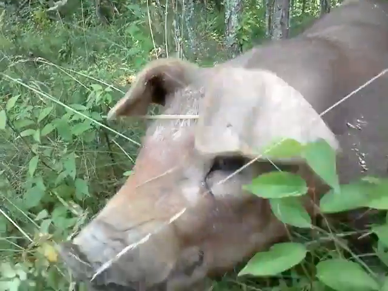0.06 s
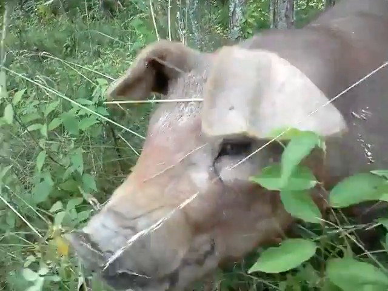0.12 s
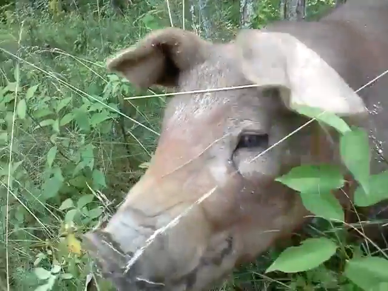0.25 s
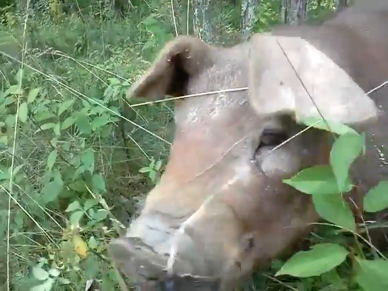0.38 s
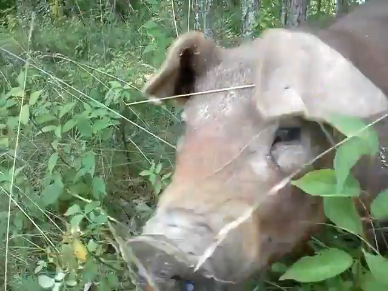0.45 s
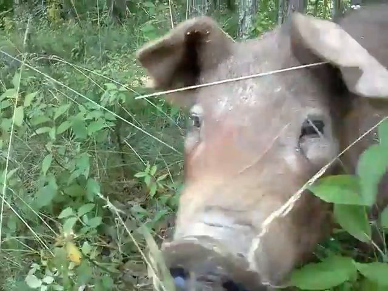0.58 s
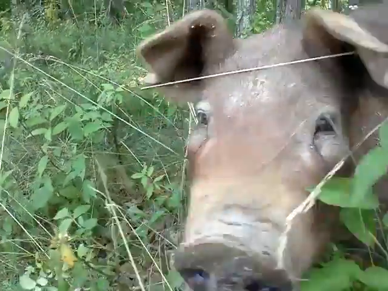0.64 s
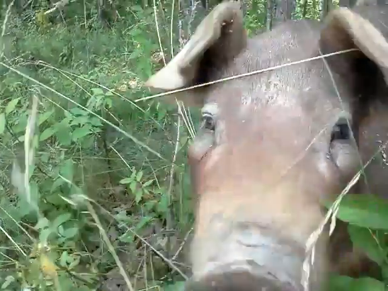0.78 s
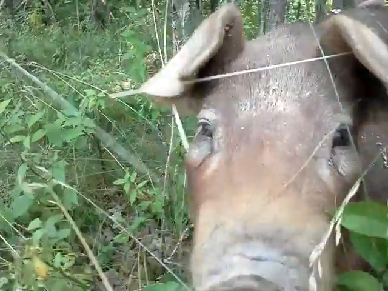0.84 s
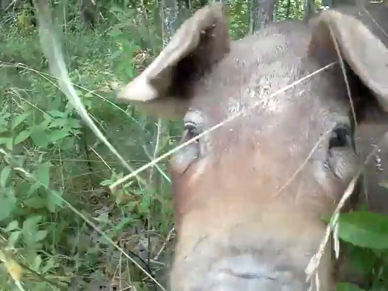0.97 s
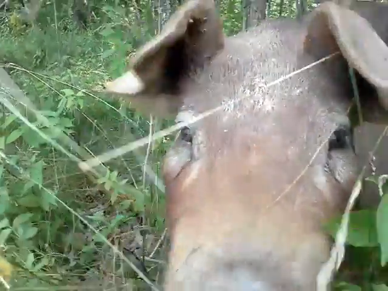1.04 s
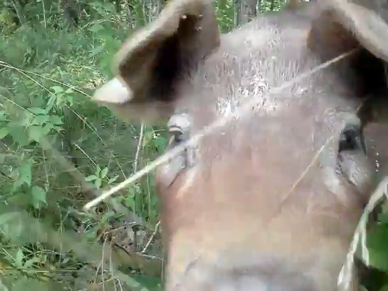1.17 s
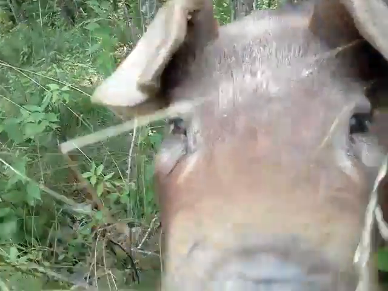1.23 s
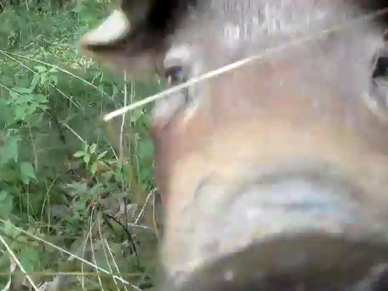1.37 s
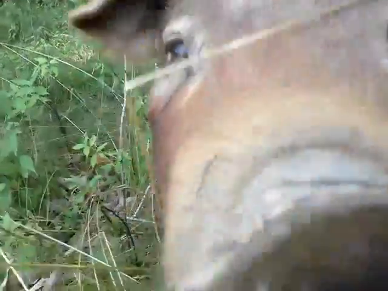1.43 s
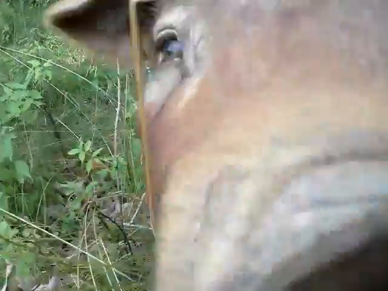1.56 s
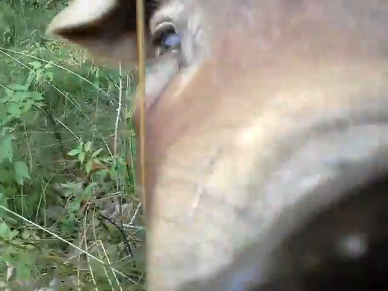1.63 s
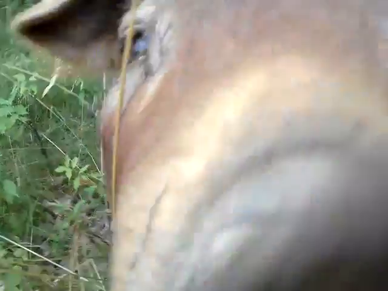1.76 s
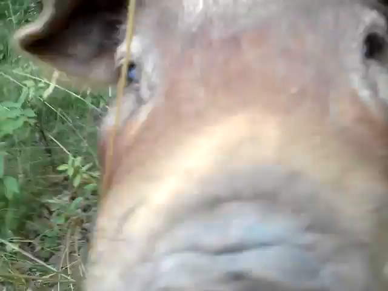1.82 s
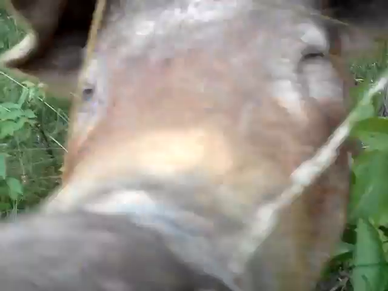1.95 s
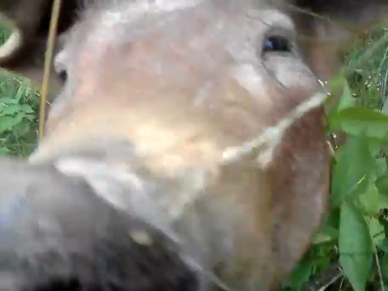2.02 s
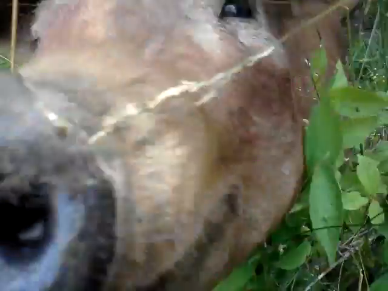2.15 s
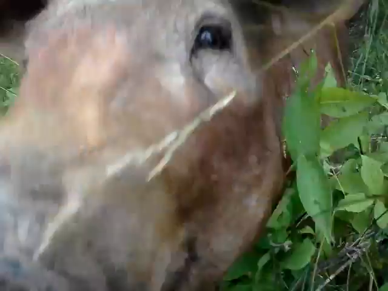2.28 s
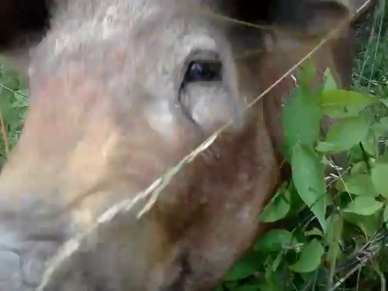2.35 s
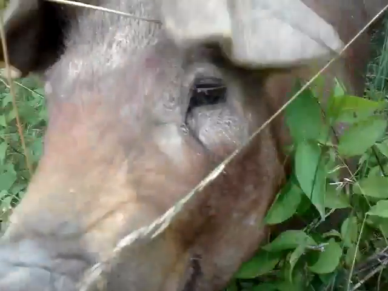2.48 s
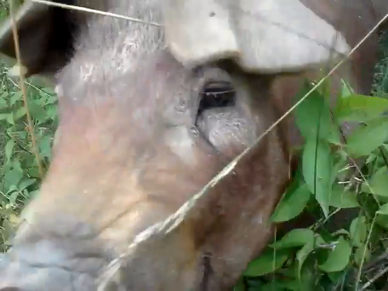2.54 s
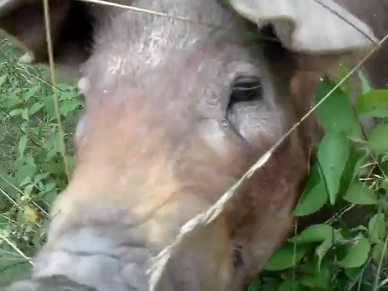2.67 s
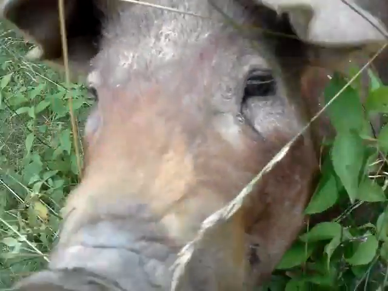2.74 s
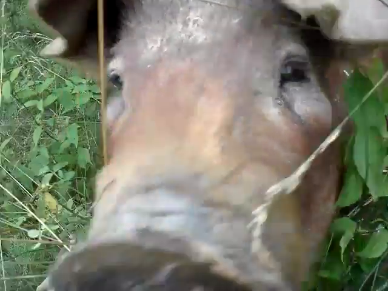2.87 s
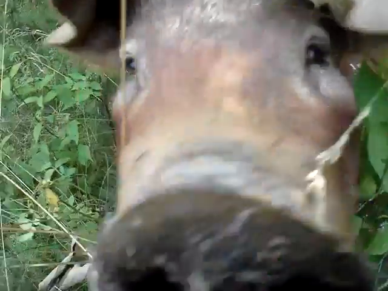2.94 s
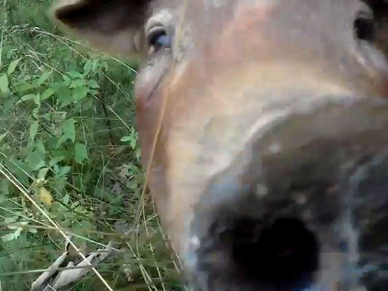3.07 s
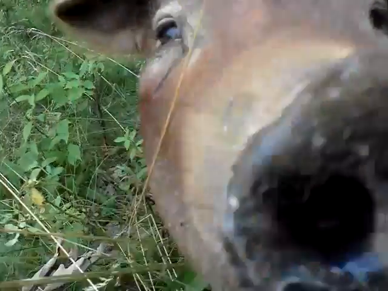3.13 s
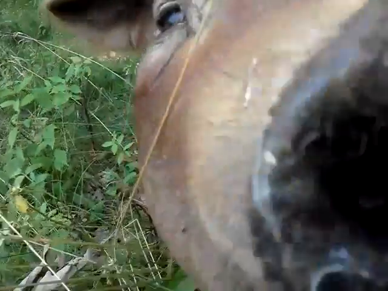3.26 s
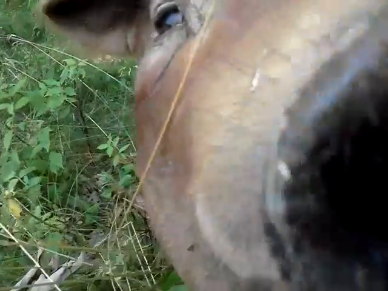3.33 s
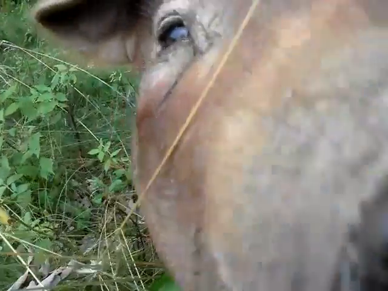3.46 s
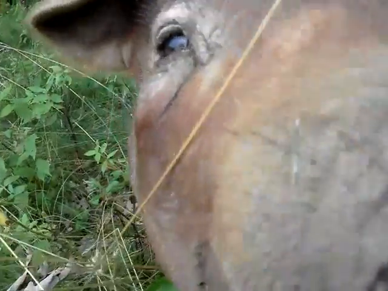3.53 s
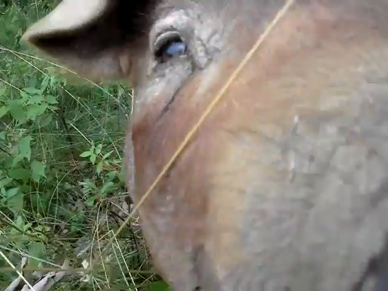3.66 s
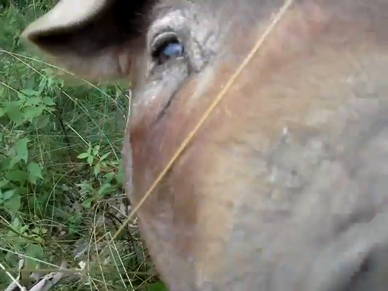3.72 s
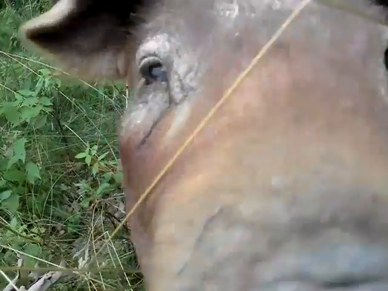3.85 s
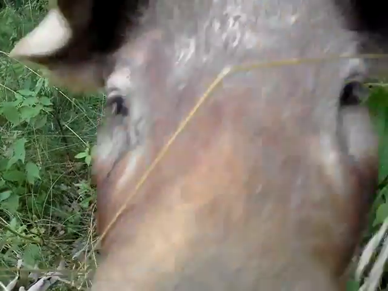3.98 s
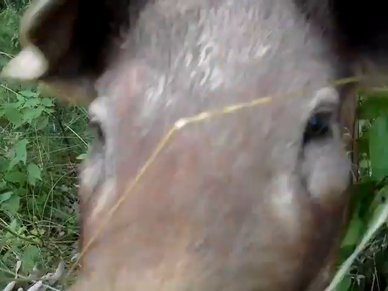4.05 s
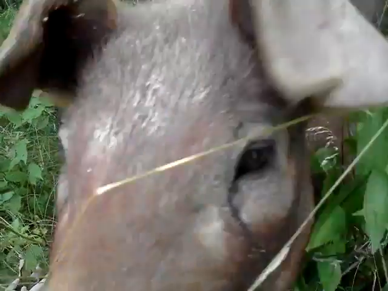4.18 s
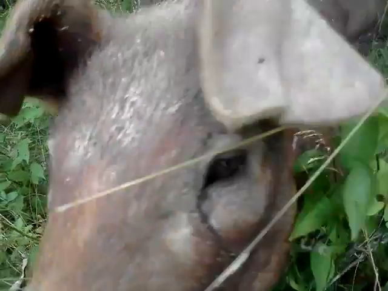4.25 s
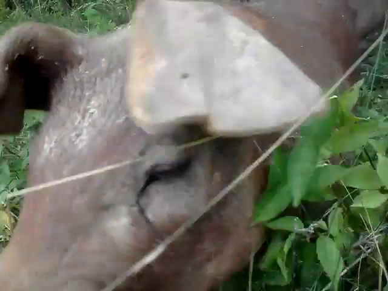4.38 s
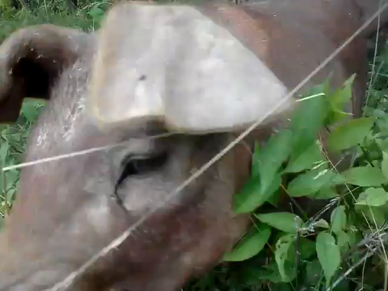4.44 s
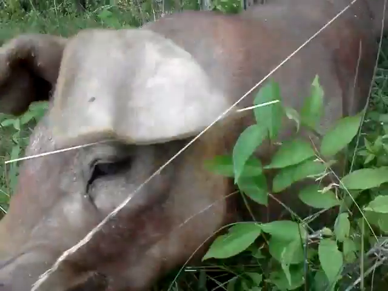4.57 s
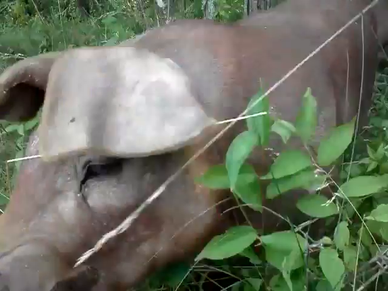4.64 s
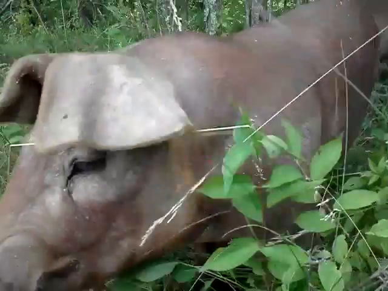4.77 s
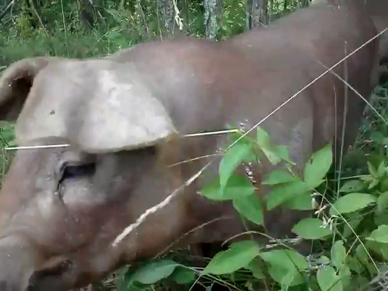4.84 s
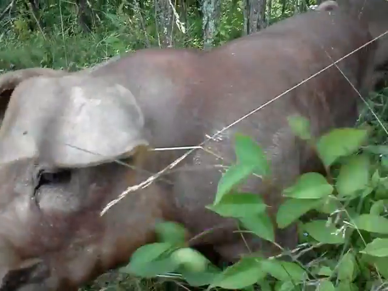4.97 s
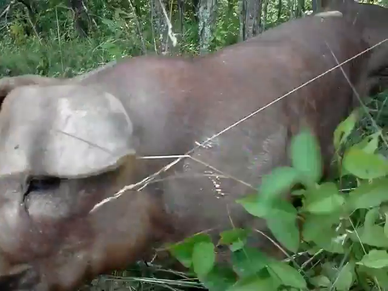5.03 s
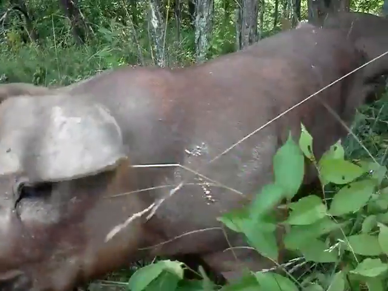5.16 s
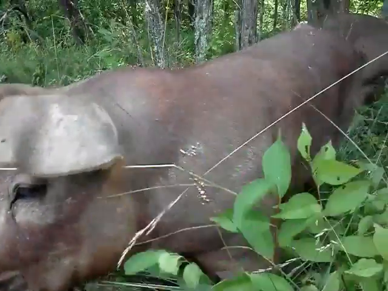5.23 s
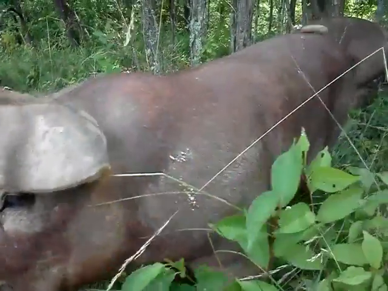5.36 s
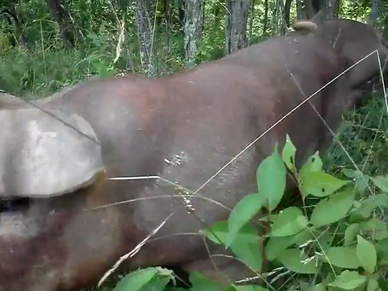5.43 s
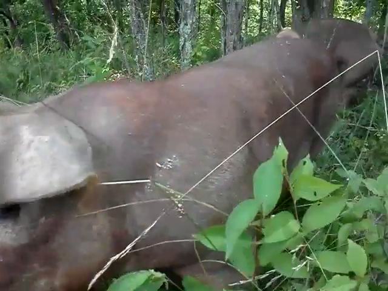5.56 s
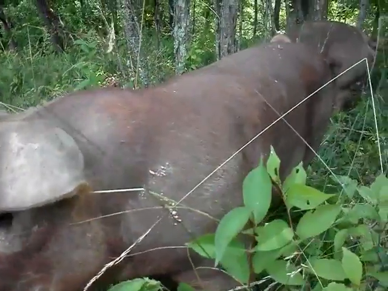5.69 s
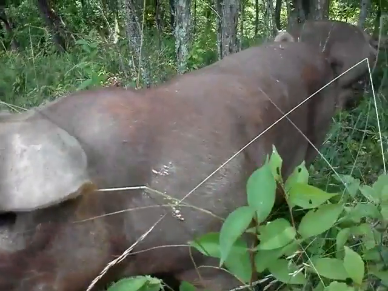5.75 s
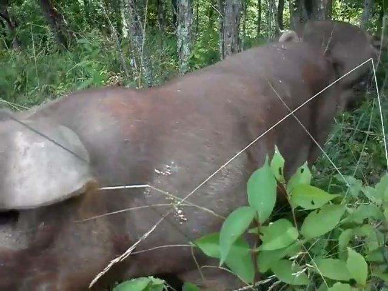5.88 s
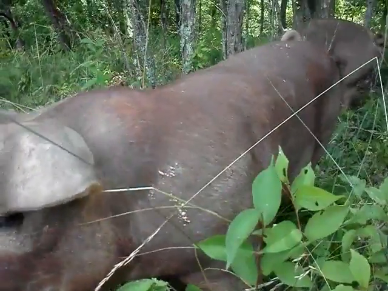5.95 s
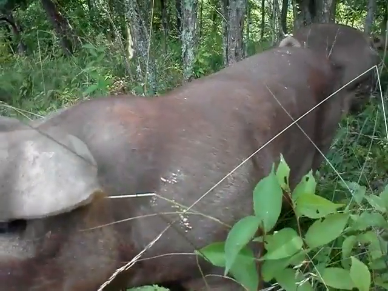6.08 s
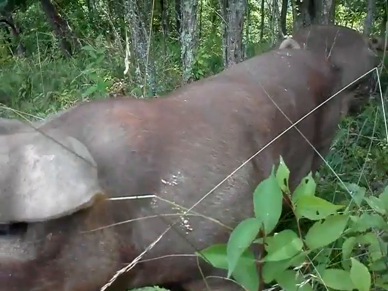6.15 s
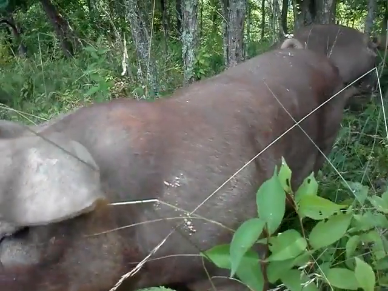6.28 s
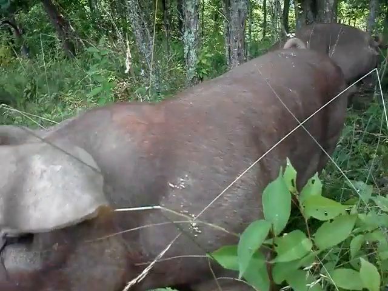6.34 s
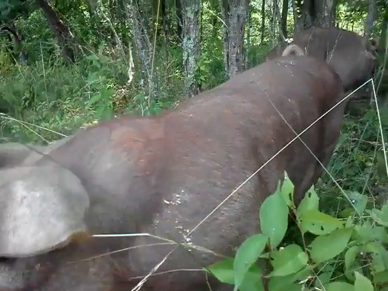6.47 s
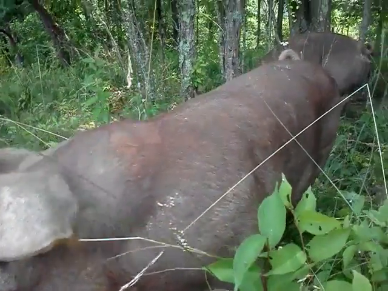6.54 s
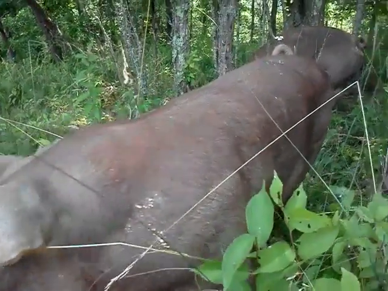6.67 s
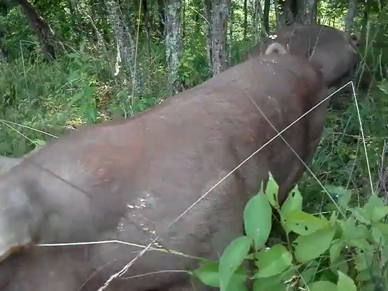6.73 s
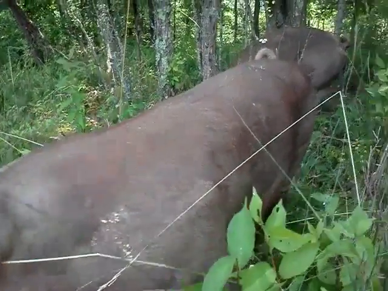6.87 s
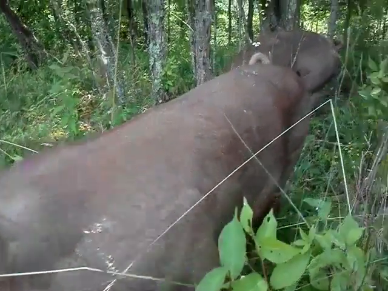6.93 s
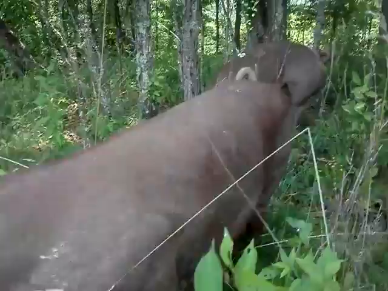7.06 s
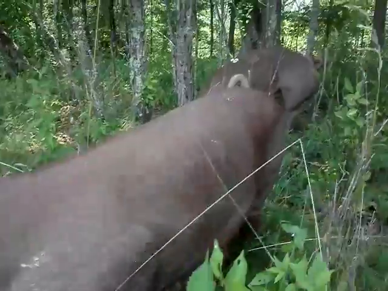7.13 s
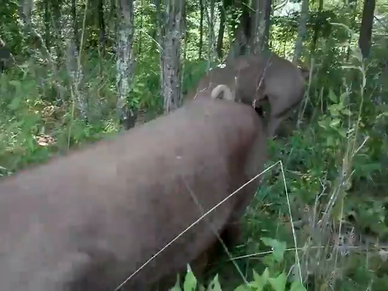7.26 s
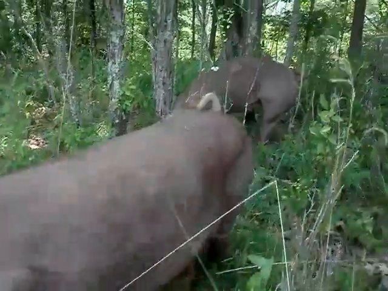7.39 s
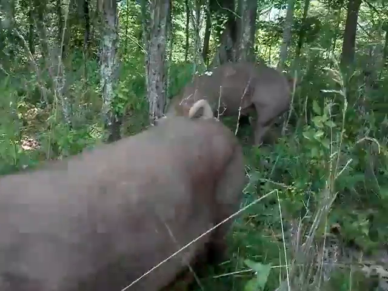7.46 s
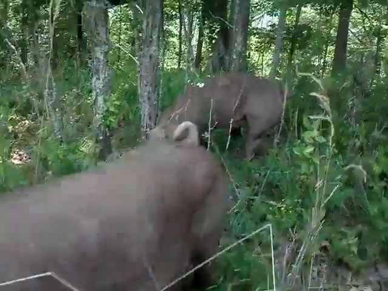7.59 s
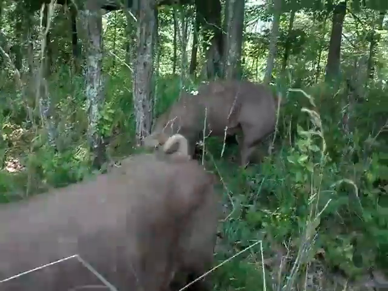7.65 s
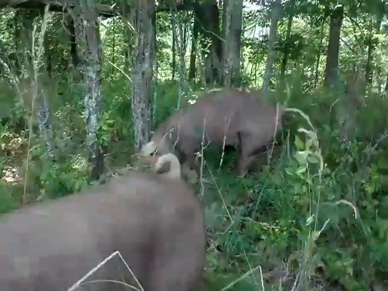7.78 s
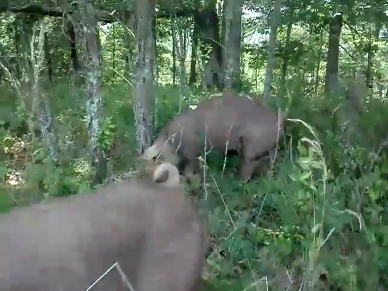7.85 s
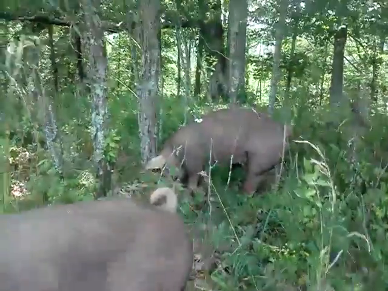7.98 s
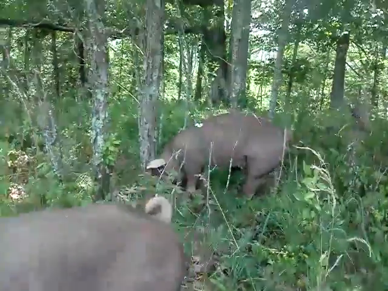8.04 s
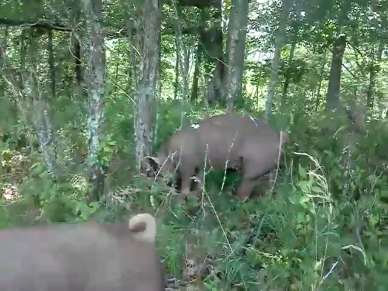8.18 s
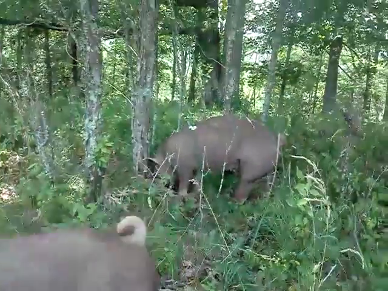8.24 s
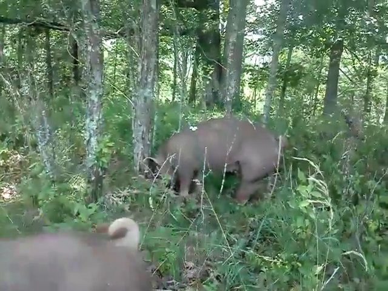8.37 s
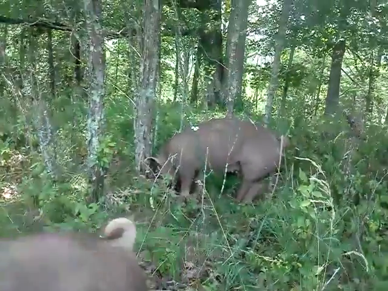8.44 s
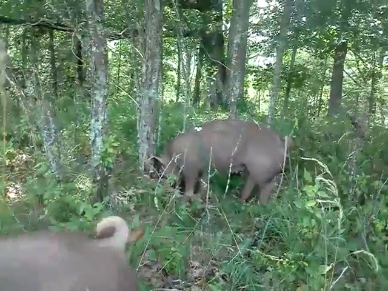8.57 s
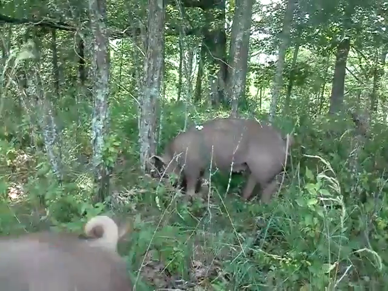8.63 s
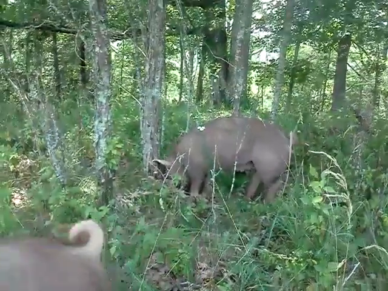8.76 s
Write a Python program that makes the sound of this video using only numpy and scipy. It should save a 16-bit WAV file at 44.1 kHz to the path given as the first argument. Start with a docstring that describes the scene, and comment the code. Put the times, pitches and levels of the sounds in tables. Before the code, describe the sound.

Quiet woodland air, with thin rustle and faint sniffs from 0.1 to 0.9 s; barely audible low hoots from a far bird come at 0.4 and 0.9. At 1.1 a loud swish of leaves arrives with a short, low double-pulsed grunt and snapping stems. Snorts grow closer: 1.4, a strong nasal blast at 1.9, softer ones at 2.1 and 2.4, with dense dry crackling and sharp snaps from 2.2 to 2.7. Light sniffs follow, then the loudest snort at 3.5 and a softer one at 3.9. Leaves brush again at 4.3-4.7 with weak sniffs. From 5 to 6.3 it is calm: slight rustle, faint high bird whistles near 5.4-5.7, a last tiny sniff at 5.7. A low grunt at 6.85 precedes a crackling sweep through plants, 7.0-7.6. Lighter brushing and ticks continue, with a final grunt at 8.2, ending at 8.8.

```python
"""Leaves brush and a pig sniffs, then snorts harder, close by in a wood; no snorts after 5.8 s.
Snorts: noise through nose resonances plus nostril hiss. Three low grunts: vocal-fold flaps ringing the throat.
Plants: friction noise and clumped clicks, coloured as leaf, grass and stem; dry stems snap, twigs tick.
Behind: soft air noise and faint wavering sine notes of far birds, low hoots and higher whistles.
"""
import sys
import numpy as np
from scipy import signal
from scipy.fft import rfft, irfft
from scipy.io import wavfile
from scipy.ndimage import uniform_filter1d

SR = 44100
rng = np.random.default_rng(int(sys.argv[2]) if len(sys.argv) > 2 else 0)


def unload_audio(sound):
    """Save the sound as a 16-bit wav file, at the path given as the first command line argument."""
    columns = np.transpose(np.atleast_2d(sound))
    # keep every value between -1 and 1, then stretch to whole-number steps
    steps = np.round(np.clip(columns, -1, 1) * 32767)
    wavfile.write(sys.argv[1], SR, steps.astype(np.int16))


N = 388521
TIME_S = np.arange(N) / SR

# Air blasts through the snout: start_s, end_s, level_db, hiss_above_level_db, nose_pitch_factor
SNORT_BLASTS = [(0.143, 0.334, -37, 1, 1.12), (0.503, 0.627, -42.5, 3, 1.02),
                (0.781, 0.908, -37.5, 8.5, 1.04), (1.119, 1.217, -31.5, 2, 1.13),
                (1.415, 1.508, -25.5, 4, 1.06), (1.921, 2.038, -17.5, 0, 1.074),
                (2.133, 2.232, -26.5, -2, 1), (2.395, 2.546, -31, 3.5, 0.96), (2.71, 2.833, -42.5, 3, 0.99),
                (3.034, 3.11, -36.5, 4.5, 0.98), (3.47, 3.635, -17, 4, 1.065),
                (3.881, 4.052, -28, 2, 1.016), (4.192, 4.325, -42, 0.5, 0.93), (4.464, 4.606, -43, 1, 0.98),
                (4.6, 4.68, -49, 1, 0.92), (5.687, 5.78, -49, 2, 0.96)]
# Nose resonances before the pitch factor: centre_hz, width_hz, relative_db
NOSE_MODES = [(102, 132, -8.5), (276, 60.5, 2), (361, 132, -3.5), (530, 166, -6.5), (770, 380, -12.5),
              (1056, 175, -9.5), (1890, 340, -17)]
# Jet spectrum at the nostril rims: frequency_hz, relative_db_per_hz
JET_SPECTRUM = [(40, -3), (150, -14.5), (400, -12), (1400, -10), (2400, -4), (2900, -4), (3500, 1),
                (4800, 1.5), (7000, -4.5), (8500, -12)]

# Grunts: start_s, flaps_count, first_gap_s, last_flap_relative_db, brightness_hz, mouth_opening_pitch_factor
GRUNT_EVENTS = [(1.0566, 2, .0275, -2, 2200, 0.98), (6.845, 3, 0.023, -12, 3400, 1.0),
                (8.1757, 3, 0.022, -13.5, 2090, 1.067)]
# Throat resonances, nominal pitch: centre_hz, relative_db, t60_s
THROAT_MODES = [(96, -16.5, 0.11), (231.5, 0.5, 0.052), (427, -7.5, 0.028), (701, -4, 0.061),
                (1060, -3.5, 0.011), (1595, -8.5, 0.032), (1945, -2.5, 0.013), (2300, -5, 0.016)]
# First flap is dull; later ones are louder, each after a longer gap than the last
FIRST_FLAP_BRIGHTNESS_HZ, GAP_GROWTH_RATIO, FLAP_RISE_DB = 360, 1.33, 5
# Low resonances stir as the folds open, just ahead of the closing slap
OPENING_LEAD_S, OPENING_HZ = 0.0025, 402

# Shoves of snout, flank or leg through plants:
# start_s, end_s, leaf_db, stem_relative_to_leaf_db, dryness_0_to_1, taper_exponent (low abrupt, high gradual)
PLANT_SHOVES = [(0.053, 0.129, -40.5, -13, 0.67, 0.72), (0.644, 0.797, -38, -20, .4, 0.54),
                (1.071, 1.212, -14, -10.5, 0.36, 0.54), (1.277, 1.303, -33, 0, 0.5, 0.45),
                (1.314, 1.362, -28.5, -4.5, 1, 0.42), (1.509, 1.6, -25, -8, 0.94, 0.51),
                (1.605, 1.786, -32, -11, .9, .4), (1.901, 2.207, -25, -5.5, 0.32, 0.28),
                (2.233, 2.467, -20.5, -9, .9, .5), (2.375, 2.416, -17, -3.5, 0.79, .6),
                (2.455, 2.675, -35, -10, .9, 0.39), (3.119, 3.473, -34.5, -13.5, 0.57, 0.1),
                (3.643, 3.699, -30, -19, 0.48, 0.55), (3.803, 3.88, -32.5, -15, 0.76, .7),
                (4.042, 4.14, -42, -7, 0.58, 0.8), (4.304, 4.421, -28, -9, 0.45, 0.59),
                (4.396, 4.639, -25, -11.5, .5, 0.2), (4.608, 4.68, -23, -9.5, .7, 0.45),
                (5.032, 5.152, -35, -27, 0.73, 0.72), (5.794, 6.281, -46.5, -17, 0.54, .4),
                (6.361, 6.623, -36.5, -16, 0.6, 1.4), (6.621, 6.715, -36, -28, 0.62, 0.39),
                (6.966, 7.259, -21, -10, 0.51, 1.6), (7.15, 7.205, -23, -10.5, 0.41, 0.84),
                (7.286, 7.563, -23.5, -10, 0.74, 0.98), (7.376, 7.45, -18, -12.5, 0.88, 0.41),
                (7.47, 7.536, -23.5, -13, 0.99, 0.34), (7.532, 7.636, -29, -10.5, 1, .5),
                (7.821, 8.057, -32, -9.5, 0.5, 0.43), (7.937, 8.008, -28.5, -9.5, 0.57, 0.65),
                (8.209, 8.442, -29, -11, 0.45, 0.82)]
# Light rustle of plants lying against the moving pig: time_s, leaf_db, stem_db
LIGHT_RUSTLE = [(0.0, -44, -59), (0.52, -46.5, -56), (0.95, -34, -44.5), (1.67, -30, -38.5),
                (1.83, -35.5, -44.5), (2.35, -26.5, -34), (2.72, -41, -48), (3.05, -43.5, -56),
                (3.45, -37.5, -48), (3.76, -42, -52.5), (4.19, -48.5, -56.5), (4.68, -36, -43.5),
                (5.1, -36.5, -49.5), (5.55, -47.5, -52.5), (6.33, -48.5, -58.5), (6.98, -34.5, -45),
                (7.75, -37, -48.5), (8.81, -34, -49)]
# Dryness runs from soft leaves (0) to catching twigs (1)
LIGHT_DRYNESS, LIGHT_SWING_DB, SWINGS_PER_S = 0.7, 0.9, 16
# Fine grass hiss: time_s, relative_to_leaf_db
GRASS_LEVEL = [(0.0, -10.5), (1.15, -3), (2.0, -4.5), (2.6, -12.5), (3.3, -18), (4.6, -3.5), (5.7, -7),
               (7.5, -4), (8.2, -0.5)]
# Leaf spectrum: frequency_hz, relative_db_per_hz
LEAF_SPECTRUM = [(1500, -35), (2300, -8), (3400, -0.5), (4800, 0.5), (6000, -3), (7300, -11.5), (8500, -17)]
# Fine grass spectrum: frequency_hz, relative_db_per_hz
GRASS_SPECTRUM = [(4000, -12), (5500, 1.5), (7200, 2.5), (8600, -5.5)]
# Stem spectrum: frequency_hz, relative_db_per_hz
STEM_SPECTRUM = [(60, -26), (280, -14.5), (450, -10), (750, -6), (1050, -2), (1700, 0.5), (2300, -0.5),
                 (3300, -11)]
# Louder dry stems snapping: time_s, relative_peak_db, pitch_hz, knock_strength
STEM_SNAPS = [(1.086, -4, 4100, .1), (1.243, -13.5, 1850, .05), (1.285, -10, 4700, .1),
              (1.328, -7, 3820, 0.11), (1.334, -4.5, 5340, 0.11), (1.487, -6.5, 3700, .06),
              (1.558, -3.5, 3500, 0.065), (1.575, -4, 3200, .06), (1.703, -11, 3900, .05),
              (1.729, -4, 3920, .04), (1.857, -12, 3800, .09), (2.059, -6.5, 2300, .07),
              (2.13, -7, 2400, .09), (2.249, -3, 4570, 0.11), (2.397, 1.5, 5060, 0.1),
              (2.518, -1, 2900, 0.051), (2.521, -4, 4030, .09), (2.652, -6.5, 4860, .09),
              (2.683, -14.5, 3060, .06), (2.843, -20, 3580, 0.08), (3.461, -11, 4130, .15),
              (4.496, -8.5, 4040, 0.073), (4.637, -2, 5900, 0.08), (4.707, -10, 4170, 0.16),
              (4.772, -6, 4840, .05), (5.236, -17.5, 4880, .09), (5.289, -15, 3440, 0.24),
              (6.099, -22.5, 4500, 0.11), (6.181, -20.5, 3730, 0.063), (6.994, -7.5, 4600, 0.066),
              (7.392, -4, 4200, .09), (7.553, -9, 4330, .09), (7.57, -7.5, 3500, .06),
              (7.699, -9, 3980, 0.19), (7.702, -13.5, 4100, 0.12), (7.977, -11, 4340, 0.11),
              (8.03, -6, 4950, 0.032), (8.405, -8, 4700, 0.056), (8.673, -6.5, 5090, 0.32)]

# Far bird notes: start_s, end_s, pitch_hz, level_db
BIRD_NOTES = [(0.39, 0.487, 720, -54.5), (0.927, 1.06, 725, -50.5), (5.41, 5.49, 3380, -57),
              (5.535, 5.69, 2850, -55), (6.28, 6.44, 724, -59.5)]
# Air of the wood, spectrum: frequency_hz, relative_db_per_hz
AIR_SPECTRUM = [(25, -1), (60, -1), (130, -2), (280, 0), (550, -3), (800, -9.5), (2000, -11), (8000, -23.5)]
# Air of the wood, level: time_s, level_db
AIR_LEVEL = [(0.0, -53.5), (5.0, -54), (5.4, -49.5), (6.05, -54), (8.81, -50.5)]


def snorts(flutter_db=1.5, flutter_per_s=150, nose_db=-0.45, low_cut_hz=190):
    """Turbulent air rings the nose and hisses at the nostrils, whose soft rims flutter."""
    out = np.zeros(N)
    hiss = colour(rng.standard_normal(N), JET_SPECTRUM)
    low_cut = signal.butter(2, low_cut_hz, "high", fs=SR, output="sos")
    eddies = signal.sosfilt(low_cut, rng.standard_normal(N))
    for start_s, end_s, level_db, hiss_db, pitch_factor in SNORT_BLASTS:
        span = slice(int(start_s * SR), int(end_s * SR))
        nose = 0
        for k, (centre_hz, width_hz, mode_db) in enumerate(NOSE_MODES):
            ring = resonate(eddies[span], centre_hz * pitch_factor, width_hz)
            nose = nose + (-1) ** k * from_db(mode_db) * ring  # alternating polarity
        blast = from_db(nose_db) * rms_one(nose) + from_db(hiss_db) * hiss[span]
        out[span] += from_db(level_db) * swell(start_s, end_s)[span] * blast
    return out * from_db(flutter_db * drift(flutter_per_s))


def grunts(trim_db=-4):
    """Slow flaps of the folds each ring the throat; a soft flap leaves the upper resonances out."""
    out, t_s = np.zeros(N), TIME_S[:SR // 10]
    for flap_s, flaps, gap_s, level_db, bright_hz, opening in GRUNT_EVENTS:
        for k in range(flaps):
            flap_db = trim_db + level_db - FLAP_RISE_DB * (flaps - 1 - k)
            cutoff_hz = bright_hz if k else FIRST_FLAP_BRIGHTNESS_HZ
            for hz, mode_db, t60_s in THROAT_MODES:
                # Mouth opening shifts the upper resonances most
                pitch_hz = hz * opening ** min(hz / 700, 1) * (1 + 0.01 * rng.standard_normal())
                softness = 1 / np.hypot(1, (hz / cutoff_hz) ** 2)
                ring = np.sin(2 * np.pi * pitch_hz * t_s) * from_db(-60 * t_s / t60_s)
                onset = 1 - np.exp(-t_s * hz * 2)
                lead_s = OPENING_LEAD_S / (1 + (hz / OPENING_HZ) ** 2)
                add(out, flap_s - lead_s, from_db(flap_db + mode_db) * softness * ring * onset)
            flap_s = flap_s + gap_s * GAP_GROWTH_RATIO ** k
    return out


def brushing(skew=0.95):
    """Shoves add in power to the light rustle: leaf dB, stem dB and power-weighted dryness over time."""
    swing_db = LIGHT_SWING_DB * drift(SWINGS_PER_S)
    leaf_power, stem_power = from_db(np.array(in_time(LIGHT_RUSTLE)) + swing_db) ** 2
    dry_power = leaf_power * LIGHT_DRYNESS
    for start_s, end_s, level_db, stem_db, dryness, taper in PLANT_SHOVES:
        power = (from_db(level_db) * swell(start_s, end_s, skew, taper)) ** 2
        leaf_power = leaf_power + power
        stem_power = stem_power + power * from_db(stem_db) ** 2
        dry_power = dry_power + power * dryness
    dryness = np.clip(dry_power / leaf_power, 0, 0.95)
    return 10 * np.log10(leaf_power), 10 * np.log10(stem_power), dryness


def rustle(leaf_db, stem_db, dryness, leaf_trim_db=-0.93, grass_trim_db=-1.1, own_share=0.74):
    """Soft leaves slide with a smooth hiss; dry ones catch in clicks that shake leaf, grass and stem at once."""
    grass_db, = in_time(GRASS_LEVEL)
    shared = crackle(clicks_per_s=3200, spread_db=4.0, clump_db=6.0)
    layers = (
        (LEAF_SPECTRUM, leaf_db + leaf_trim_db),
        (GRASS_SPECTRUM, leaf_db + grass_db + grass_trim_db),
        (STEM_SPECTRUM, stem_db),
    )
    out = np.zeros(N)
    for spectrum, level_db in layers:
        own = crackle(clicks_per_s=3400, spread_db=4.5, clump_db=4.5)
        clicks = (shared + own_share * own) / np.hypot(1, own_share)
        friction = np.sqrt(dryness) * clicks + np.sqrt(1 - dryness) * rng.standard_normal(N)
        out += from_db(level_db) * colour(friction, spectrum)
    return leaf_colours(out)


def crackle(clicks_per_s, spread_db, clump_db):
    """Tiny slips of many sizes arrive in clumps, evened in power over about 54 ms."""
    born = rng.random(N) < clicks_per_s / SR
    sizes_db = spread_db * np.minimum(rng.exponential(1, N), 3.5)
    sizes = from_db(sizes_db) * rng.choice([-1, 1], N)
    clicks = born * sizes * from_db(clump_db * drift(260))
    local_power = uniform_filter1d(clicks ** 2, size=2400)
    return clicks / np.sqrt(np.maximum(local_power, 1e-9))


def leaf_colours(x, depth=0.28, changes_per_s=32, quality=9):
    """Each leaf touched has its own pitch, so narrow resonances come and go at random."""
    pitches_hz = np.geomspace(900, 7600, num=20)
    return x + depth * sum(drift(changes_per_s) * resonate(x, hz, hz / quality) for hz in pitches_hz)


def snaps(breaks, width_hz=2100, splinter=0.27, splinter_t60_s=0.015, trim_db=0.3):
    """A breaking stem gives a crack a few cycles long, a dull knock and a short spray of splitting fibres."""
    out, t_s = np.zeros(N), TIME_S[:SR // 20]
    for time_s, peak_db, pitch_hz, knock in breaks:
        force = splinter * rng.standard_normal(len(t_s)) * from_db(-60 * t_s / splinter_t60_s)
        force[0] = 2  # the break itself
        crack = resonate(resonate(force, pitch_hz, width_hz), pitch_hz, 3 * width_hz)
        crack = crack + knock * resonate(force, 900, 1800)
        add(out, time_s, from_db(peak_db + trim_db) * crack / np.abs(crack).max())
    return out


def twig_ticks(leaf_db, dryness, above_db=14, spread_db=1.0, ceiling_db=-12, knock=0.09, count=300):
    """Small twigs tick at random where plants are dry; rows have the columns of STEM_SNAPS."""
    when, chance, size, pitch = rng.random((count, 4)).T
    at = (when * N).astype(int)
    peak_db = np.minimum(leaf_db[at] + above_db + spread_db * (2 * size - 1), ceiling_db)
    pitch_hz = 1900 * 3 ** pitch
    ticks = np.column_stack([at / SR, peak_db, pitch_hz, np.full(count, knock)])
    return ticks[chance < dryness[at] ** 3]


def trees(x, echo_db=-22, t60_s=0.2):
    """Trunks and ground scatter back a thin, short tail."""
    t_s = TIME_S[:SR // 2]
    scatter = rng.standard_normal(len(t_s)) * from_db(-60 * t_s / t60_s)
    return x + from_db(echo_db) * signal.fftconvolve(x, scatter / np.linalg.norm(scatter))[:N]


def wood():
    """Soft outdoor air as coloured noise; far birds as sines that waver a little."""
    air_db, = in_time(AIR_LEVEL)
    air = from_db(air_db) * colour(rng.standard_normal(N), AIR_SPECTRUM)
    waver = 0.002 * drift(60)
    calls = 0
    for start_s, end_s, pitch_hz, level_db in BIRD_NOTES:
        note = np.sin(pitch_hz * (2 * np.pi * TIME_S + waver))
        calls = calls + from_db(level_db) * swell(start_s, end_s) * note
    return air + np.sqrt(2) * calls  # sine levels are rms


def from_db(db):
    """Decibels to amplitude gain."""
    return 10 ** (np.asarray(db) / 20)


def rms_one(x):
    """Scale to unit power."""
    return x / np.sqrt(np.mean(x ** 2) + 1e-20)


def drift(knots_per_s):
    """Straight lines between normal random values, `knots_per_s` a second."""
    knots = rng.standard_normal(8000)
    return np.interp(TIME_S * knots_per_s, np.arange(len(knots)), knots)


def colour(x, spectrum):
    """Minimum-phase filter with the given spectrum; rms 1."""
    size = 4096
    hz, db = np.transpose(spectrum)
    grid_hz = np.maximum(np.arange(size // 2 + 1) * SR / size, 1)
    octaves_above = np.maximum(np.log2(grid_hz / hz[-1]), 0)
    octaves_below = np.clip(np.log2(hz[0] / grid_hz), 0, 1)
    skirts_db = -24 * (octaves_above + octaves_below)
    shape_db = np.interp(np.log(grid_hz), np.log(hz), db) + skirts_db
    cepstrum = irfft(np.log(from_db(shape_db)))
    response = irfft(np.exp(rfft(2 * cepstrum[:size // 2], size)))  # folded cepstrum: causal
    return rms_one(signal.fftconvolve(x, response)[:N])


def resonate(x, hz, width_hz):
    """Two-pole resonance with about unit gain at its peak."""
    r = np.exp(-np.pi * width_hz / SR)
    zeros = np.array([1, 0, -1]) * (1 - r * r) / 2
    poles = [1, -2 * r * np.cos(2 * np.pi * hz / SR), r * r]
    return signal.lfilter(zeros, poles, x)


def swell(start_s, end_s, skew=0.78, taper=0.95):
    """Rounded rise and fall of height 1; skew under 1 makes the rise quicker."""
    phase = np.interp(TIME_S, [start_s, end_s], [0, 1]) ** skew
    return np.abs(np.sin(np.pi * phase)) ** taper


def in_time(rows):
    """Each column of a curve, interpolated at every sample."""
    time_s, *columns = np.transpose(rows)
    return [np.interp(TIME_S, time_s, column) for column in columns]


def add(out, time_s, sound):
    """Mix in a short sound at time_s."""
    at = int(time_s * SR)
    out[at:at + len(sound)] += sound[:N - at]


def scene():
    """Pig and close plants, with tree scatter, over the wood behind."""
    leaf_db, stem_db, dryness = brushing()
    breaks = [*STEM_SNAPS, *twig_ticks(leaf_db, dryness)]
    plants = rustle(leaf_db, stem_db, dryness) + snaps(breaks)
    return (trees(snorts() + grunts() + plants) + wood())[None]


def record(dry):
    """A small recorder dulls the treble, rounds the highest peaks and cuts the top."""
    dulled = signal.sosfilt(signal.butter(12, 7800, fs=SR, output="sos"), dry)
    rounded = dulled / (1 + (dulled / 0.7) ** 6) ** (1 / 6)
    top_cut = signal.ellip(8, 0.2, 70, 8650, fs=SR, output="sos")  # ripple_db, stop_db, cutoff_hz
    return signal.sosfilt(top_cut, rounded)


dry = scene()
out = record(dry)
unload_audio(out)
```